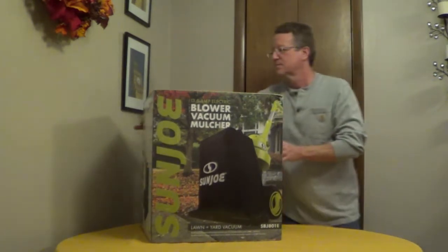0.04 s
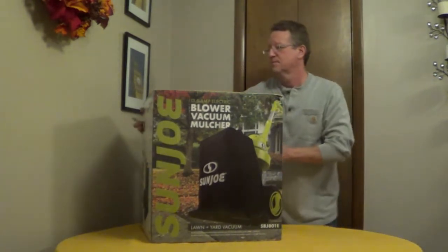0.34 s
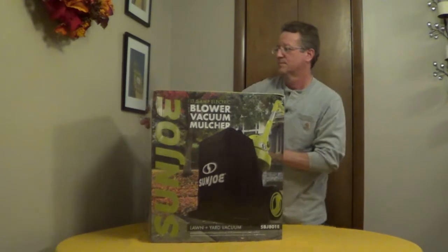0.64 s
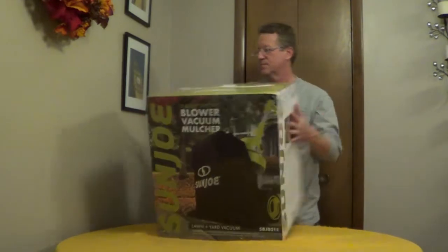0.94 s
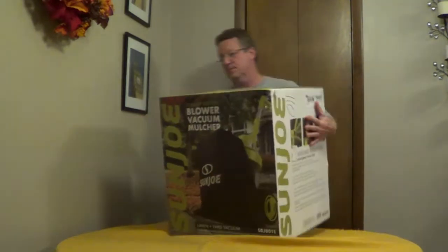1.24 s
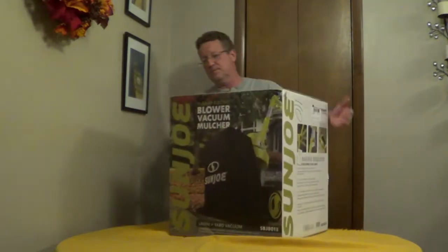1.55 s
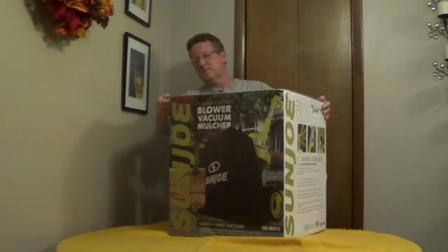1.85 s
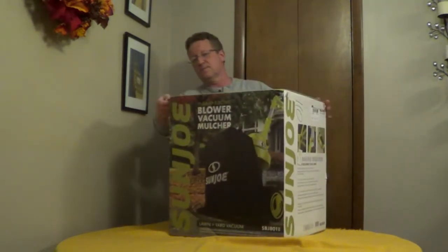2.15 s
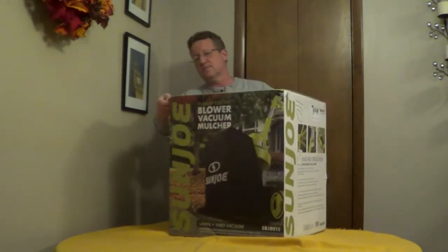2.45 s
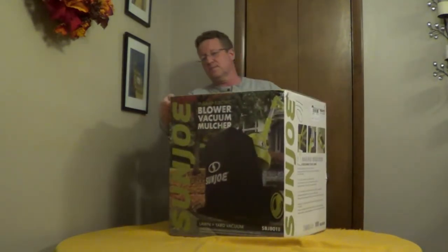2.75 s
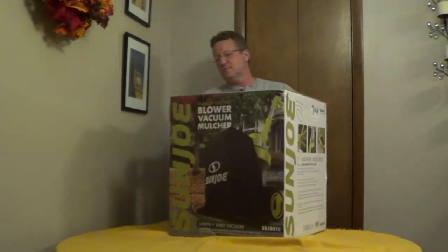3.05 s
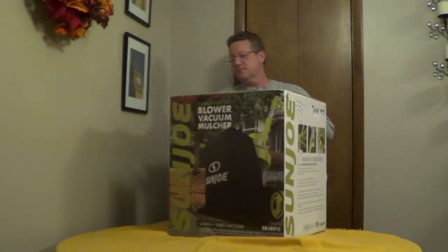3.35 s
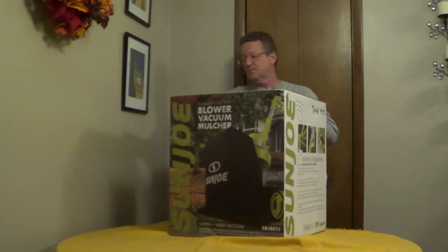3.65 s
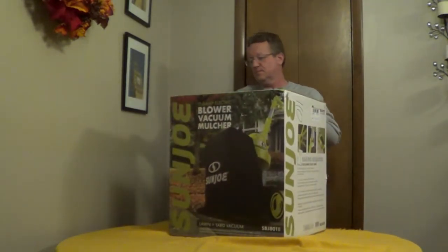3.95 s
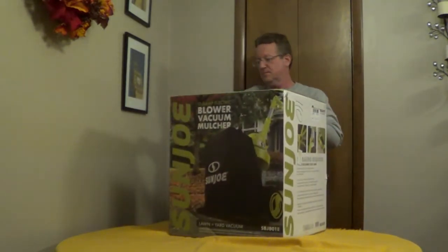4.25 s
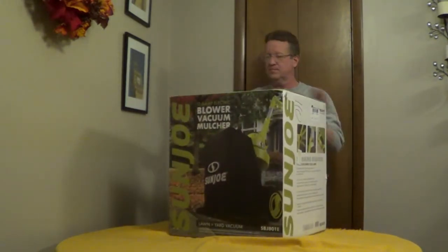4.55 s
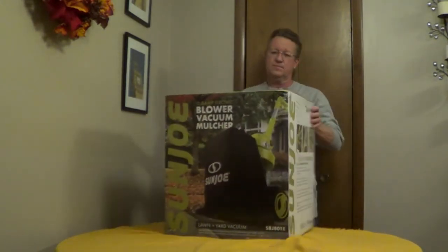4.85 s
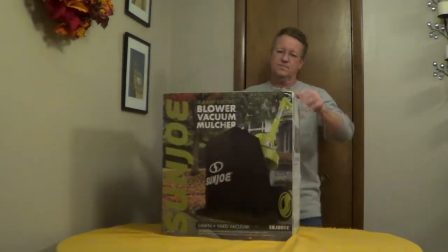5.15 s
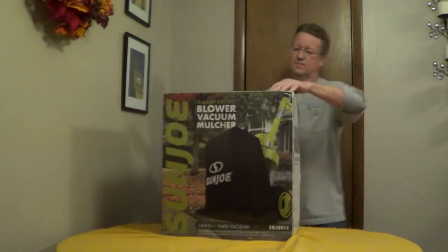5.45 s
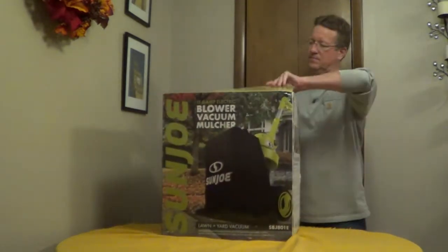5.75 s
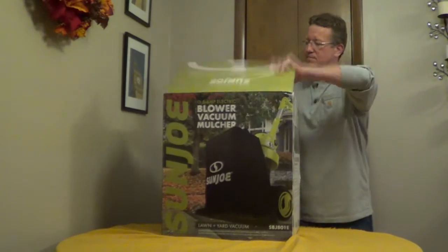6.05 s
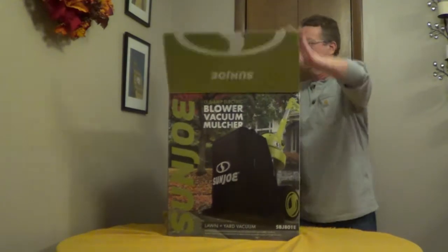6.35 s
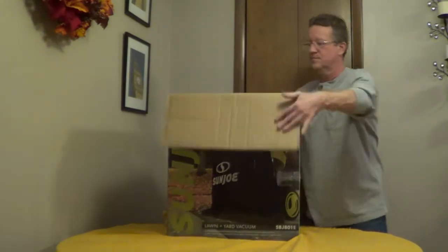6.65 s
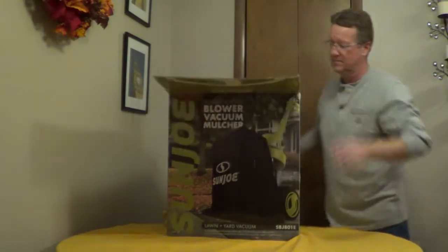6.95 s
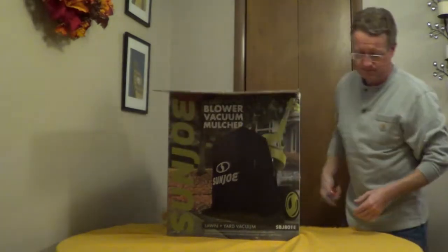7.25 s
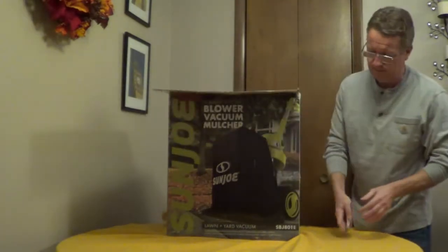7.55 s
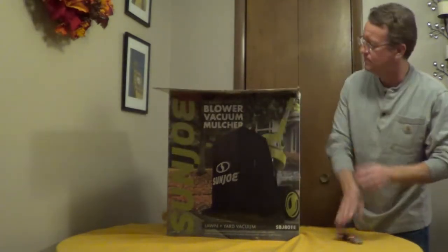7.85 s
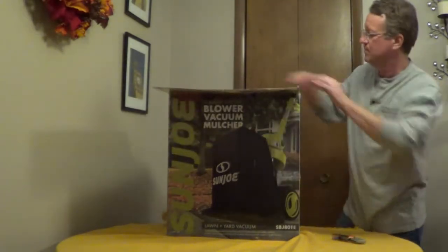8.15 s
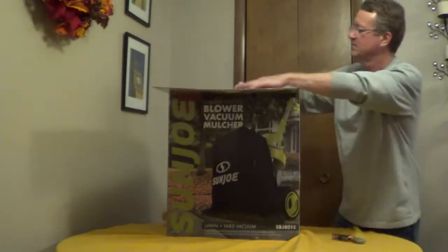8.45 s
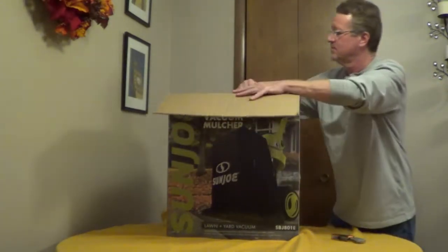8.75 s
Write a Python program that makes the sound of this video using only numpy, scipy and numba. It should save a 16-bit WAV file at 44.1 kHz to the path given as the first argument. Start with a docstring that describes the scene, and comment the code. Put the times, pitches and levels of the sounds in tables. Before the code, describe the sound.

For the first two seconds a large cardboard box rubs and knocks as it is turned on a cloth-covered table, settling with a bump at about 1.5 seconds. From 2.6 seconds a knife slits the packing tape in a dense, crackling rasp that resonates in the box and ends in a sharp crack at 4.4. The box lands with a loud hollow thump at 4.7. Hands rub and tap the cardboard, and at 6.1 the remaining tape rips briefly as a flap is lifted, with scraping and light knocks until about 7.3. The knife gives small metallic clicks from 7.4, then bounces on the table with quick dull thuds around 8. Another flap rubs, creaks softly and folds open with a sharp knock near 8.75. Everything is heard from a few metres away in a small room with faint hiss and a thin high whine.

```python
"""Cardboard rubs, knocks and thumps as a big box is turned round on a table in a small room.
A knife slits the packing tape in dense tiny snaps that ring the board, and the last of the tape rips
as a flap is pulled up. The knife clicks in the hand and bounces on the cloth-covered table; the next
flap is knocked and folded open. We listen from a few metres off, on a camera's two close-set microphones."""
import sys
import numpy as np
from scipy import signal
from scipy.fft import rfft, irfft, next_fast_len
from scipy.io import wavfile
from numba import njit

SR = 44100
rng = np.random.default_rng(int(sys.argv[2]) if len(sys.argv) > 2 else 0)


def log_audio(samples):
    """Write samples as a 16-bit WAV file to the path given in sys.argv[1]."""
    # one column per channel
    frames = np.atleast_2d(samples).T
    # limit to full scale, then quantise
    limited = np.clip(frames, -1, 1)
    pcm = np.round(limited * 32767).astype(np.int16)
    wavfile.write(sys.argv[1], SR, pcm)


N = 388514
TIME = np.arange(N) / SR
RING = np.arange(SR // 2) / SR  # seconds since a blow


def amp(db):
    """Decibels to gain."""
    return 10 ** (np.asarray(db) / 20)


def unit(x):
    """Scale to rms 1."""
    return x / np.sqrt(np.mean(x ** 2))


def peak(x, db):
    """Scale to a peak level."""
    return x * amp(db) / np.abs(x).max()


def add(track, s, sound):
    """Mix a sound into a track at s seconds."""
    i = max(int(s * SR), 0)
    track[i:i + len(sound)] += sound[:N - i]


def rise(seconds):
    """The build-up of a blow."""
    return 1 - np.exp(-RING / seconds)


def fade(t60, hold=0):
    """Exponential decay after a blow, once the hold time is over."""
    return 1000 ** (-np.maximum(RING - hold, 0) / max(t60, 1e-4))


def stroke(middle, length):
    """A movement that swells and eases off, close to a squared sine arch."""
    out, moving = np.zeros(N), np.abs(TIME - middle) < length / 2
    out[moving] = np.abs(np.cos(np.pi * (TIME[moving] - middle) / length)) ** 1.97
    return out


def held(start, hold, attack, t60):
    """Rise, keep going until the hold time is over, then die away."""
    return np.clip((TIME - start) / attack, 0, 1) * 1000 ** (-np.maximum(TIME - start - hold, 0) / t60)


def walk(rate):
    """Random wandering between rate new values a second."""
    return np.interp(TIME * rate, np.arange(N // 20), rng.standard_normal(N // 20))


def on_axis(hz, points):
    """Read (Hz, value) points on a log-frequency axis."""
    f, value = np.transpose(points)
    return np.interp(np.log(hz + 1), np.log(f), value)


def colour(x, points, tilt_db=0, size=4096):
    """Causal filter with the given spectrum, tilted by tilt_db an octave."""
    hz = np.fft.rfftfreq(size, 1 / SR)
    gain = amp(on_axis(hz, points) + tilt_db * np.log2(hz / SR + 1 / size))
    cepstrum = irfft(np.log(gain))
    cepstrum[1:size // 2] *= 2
    cepstrum[size // 2 + 1:] = 0
    return signal.oaconvolve(x, irfft(np.exp(rfft(cepstrum))))[:len(x)]


def low_cut(x, hz):
    """Take away the bass below hz."""
    return signal.sosfilt(signal.butter(3, hz, "high", fs=SR, output="sos"), x)


@njit
def resonate(x, hz, width):
    """State-variable band-pass with a moving centre; width as a share of the centre."""
    y, band, low = np.empty(len(x)), 0., 0.
    for i in range(len(x)):
        g = np.tan(np.pi * hz[i] / SR)
        v = (band + g * (x[i] - low)) / (1 + g * (g + width))
        band, low, y[i] = 2 * v - band, low + 2 * g * v, width * v
    return y


def band_pass(x, hz, width):
    """A resonance that stays at one pitch."""
    return resonate(x, np.full(len(x), float(hz)), float(width))


def snaps(rate, spread_db):
    """Fibres letting go at random: many small clicks and a few large ones."""
    size = amp(spread_db * np.minimum(rng.exponential(size=N), 4))
    return unit((rng.random(N) < rate / SR) * size * rng.standard_normal(N))


def burst(t60):
    """A dying patter of tiny contacts."""
    return rng.standard_normal(len(RING)) * fade(t60)


def ring(modes, detune, sag=0, hold=0, relax_s=0.028):
    """Damped modes, detuned as each blow finds a new spot; dented board starts sharp and sags."""
    clock = RING + sag * relax_s * rise(relax_s)
    out = 0
    for hz, db, t60 in modes:
        pitch = hz * (1 + detune * rng.standard_normal())
        out += amp(db) * fade(t60, hold) * np.sin(2 * np.pi * pitch * clock) * rng.choice([-1, 1])
    return out


def tick(contact_s, tilt_db, spectrum):
    """One hard little contact, raspy if it lasts; peak 1."""
    scrape = burst(contact_s * np.log(1000)) * rise(max(0.16 * contact_s, 1e-5))
    return peak(low_cut(colour(scrape, spectrum, tilt_db), hz=1420), 0)


# Tone of the rubbed panels and of their surface. Each row: frequency in Hz, level in dB.
RUB_PANEL = [(60, -54), (110, -5.5), (200, 4.5), (330, 0), (520, 11), (750, 5.5), (1100, 4.5), (1800, 2.5),
             (2600, -4.5), (5000, -44)]
RUB_HISS = [(1200, -30.5), (2800, -7), (4500, 0), (7000, 1), (9500, 0.5), (12000, -7.5), (15500, -16.5)]
# The box slides on the tablecloth; hands and flaps rub. Each row: middle and length in seconds,
# panel and hiss levels in dB, pitch of the rubbed spot in Hz.
RUBS = [(0, 0.18, -42, -43, 770), (0.146, 0.35, -44, -43, 1820), (0.378, 0.37, -49.5, -52, 1220),
        (0.662, 0.3, -47.5, -64, 527), (0.847, 0.89, -60, -48.5, 625), (1.048, 0.58, -40, -43.5, 378),
        (1.353, 0.92, -48.5, -53.5, 407), (1.508, 0.17, -41.5, -47, 450), (1.998, 0.35, -57.5, -61, 600),
        (2.333, 0.071, -49, -48, 700), (2.482, 0.24, -72, -49.5, 704), (5.083, 1, -49, -52, 990),
        (5.405, 0.23, -38.5, -45.5, 513), (5.57, 0.34, -48, -54, 620), (5.669, 0.24, -45.5, -45.5, 810),
        (5.779, 0.089, -47, -45.5, 2320), (5.86, 0.26, -44.5, -47, 950), (6.06, 0.42, -53.5, -52, 870),
        (6.294, 0.099, -39, -60, 855), (6.43, 0.51, -40.5, -38.5, 820), (6.641, 0.26, -39.5, -45.5, 755),
        (6.79, 0.19, -45, -42.5, 527), (6.943, 0.4, -46.5, -53, 526), (7.214, 0.41, -44, -47.5, 497),
        (8.148, 0.79, -52.5, -62, 484), (8.555, 0.57, -52, -57, 477), (8.742, 0.4, -36.5, -49, 487)]

def rubbing(spot_db=-1, roam_octaves=0.11):
    """Cardboard slips in small jerks: the panels murmur, the touched spot rings, the surface hisses."""
    panel_level = np.sqrt(sum((amp(db) * stroke(s, length)) ** 2 for s, length, db, _, _ in RUBS))
    hiss_level = np.sqrt(sum((amp(db) * stroke(s, length)) ** 2 for s, length, _, db, _ in RUBS))
    friction = snaps(rate=12000, spread_db=2.7) * amp(2.5 * walk(60))
    middles, *_, pitches = np.transpose(RUBS)
    spot_hz = np.interp(TIME, middles, pitches) * 2 ** (roam_octaves * walk(7.8))
    spot = resonate(snaps(rate=3000, spread_db=0.99), spot_hz, width=0.85)
    body = unit(unit(colour(friction, RUB_PANEL)) + amp(spot_db) * unit(spot))
    return panel_level * body + hiss_level * unit(colour(friction, RUB_HISS))


# The quiet of the small room. Each row: frequency in Hz, relative noise density in dB.
ROOM_TONE = [(30, -16), (100, -21), (170, -6.5), (280, -13), (400, -6.5), (600, -9.5), (1200, -10),
             (2400, -12), (3000, -12.5), (8000, -18.5), (11000, -21.5), (15500, -29)]

def room_tone(level_db=-54, whine_hz=15734.3, whine_db=-61):
    """Steady room noise at both microphones, and a thin electronic whine."""
    mid, side = (amp(level_db) * unit(colour(rng.standard_normal(N), ROOM_TONE)) for _ in range(2))
    return pair(mid, side) + amp(whine_db) * unit(np.sin(2 * np.pi * whine_hz * TIME))


# The hollow of the box. Each row: pitch in Hz, level in dB, t60 in seconds.
BOX_MODES = [(152.5, -17, 0.091), (222.4, -1.5, 0.13), (275, -10, 0.23), (333.7, -14.5, 0.2),
             (392.4, -14, 0.098), (427.6, -14.5, 0.22)]
# The struck spot. Each row: multiple of its pitch, level in dB.
SPOT_MODES = [(0.802, -4.5), (1, 0.5), (1.089, -4.5)]
# Tone of the panel's slap and of the surface's crack. Each row: frequency in Hz, level in dB.
BOX_SLAP = [(40, -42), (100, -25), (200, -19.5), (400, 2.5), (560, 0), (780, 3), (1050, 0), (1400, -6.5),
            (2000, -9), (3000, -13.5), (6000, -57)]
BOX_CRACK = [(1000, 5.5), (2300, 0.5), (4500, 1.5), (8500, 0), (11000, -7.5), (15500, -15)]
# Blows on the box. Each row: start in seconds, slap level in dB, boom in dB relative to the slap,
# hardness as brightness in dB per octave, pitch of the struck spot in Hz, its level in dB.
KNOCKS = [(0.168, -32.5, -18, 1.5, 1600, -28), (0.223, -51, 3.5, -19, 533, -48),
          (0.524, -33.5, -20, 2, 1760, -38), (0.650, -33.5, -10, -3.5, 515, -31),
          (1.226, -32, -9, 4.5, 575, -36), (1.526, -27.5, -16, -1.5, 450, -30),
          (1.5404, -17, -14, -2, 1306, -23.5), (1.583, -31, -3, -8.5, 584, -27.5),
          (1.668, -31.5, -22, -5.5, 590, -38), (1.729, -35.5, 3, 5.5, 395, -38),
          (1.748, -28.5, -9, 4.5, 594, -31), (1.953, -33, -13.5, -5, 570, -39),
          (2.331, -55, -22, 2, 405, -52), (2.600, -38.5, -0.5, 6, 170, -38),
          (4.426, -22.5, -14, -4.5, 492, -23), (4.714, -28, -11, 0, 277, -36),
          (4.729, -18, -20, -1, 772, -18), (4.750, -20, -4, -3, 430, -26),
          (5.047, -38, -11, -8.5, 494, -37), (5.302, -38, -14, 2, 180, -40),
          (5.491, -28, -26, 4, 1280, -41), (5.720, -34, -26, -5, 803, -30),
          (6.121, -14, -21, -1.5, 736, -27), (6.202, -20, -20, -1.5, 517, -27),
          (6.429, -26, -12.5, 2, 900, -27), (6.472, -38.5, 4.5, -11, 182, -29),
          (6.776, -28, -14, -6, 476, -30), (7.062, -35, -33, 2, 1510, -44),
          (8.436, -45, -4.5, -12, 174, -38), (8.464, -39, -4, 12.5, 2033, -33),
          (8.577, -30.5, 2, -3.5, 175, -26.5), (8.673, -22, -20, 4, 1170, -30),
          (8.712, -22.5, -10, 2.5, 1340, -33), (8.751, -17.5, -9.5, 5.5, 1425, -17)]

def knocks(slap_t60=0.14, crack_t60=0.095, spot_t60=0.076, swell_s=0.014):
    """The panel slaps, the spot rings, the hollow swells after; harder blows are quicker and crack more."""
    out = np.zeros(N)
    for s, db, boom_db, hardness, hz, spot_db in KNOCKS:
        contact_s = 0.0007 * 2 ** (-hardness / 22) / amp(db) ** 0.18  # board stiffens under load
        push, swell = rise(contact_s), rise(contact_s + swell_s)
        spot_modes = [(hz * ratio, mode_db, spot_t60) for ratio, mode_db in SPOT_MODES]
        spot = ring(spot_modes, detune=0.0063, sag=0.015)
        add(out, s, peak(colour(burst(slap_t60) * push, BOX_SLAP, hardness), db))
        add(out, s, peak(spot * push, spot_db - 2))
        add(out, s, peak(ring(BOX_MODES, detune=0.015, sag=0.05) * swell, db + boom_db))
        add(out, s, peak(colour(burst(crack_t60) * push, BOX_CRACK), db + 0.98 * hardness - 2))
    return low_cut(out, hz=122)


# Air pushed out at the box. Each row: start in seconds, level in dB.
PUFFS = [(1.528, -40), (4.733, -40), (8.75, -58)]

def puffs():
    """Setting the box down or folding a flap gives a short, very low push of air."""
    out = np.zeros(N)
    for s, db in PUFFS:
        add(out, s, peak(band_pass(burst(t60=0.4), hz=45, width=1), db))
    return out


# The walls of the box. Each row: pitch in Hz, level in dB, t60 in seconds.
PANEL_MODES = [(564, 1, 0.1), (670, 2.5, 0.065), (760, 2, 0.11), (975, -12, 0.19), (1267, -16, 0.2),
               (1504, -10, 0.055), (1776, -14, 0.07), (2050, -15.5, 0.043)]
# The whole box drops back on the table. Each row: start in seconds, boom level in dB,
# seconds for which its weight drives the boom, clap level in dB.
THUMPS = [(1.545, -30, 0.022, -25), (1.749, -30, 0.048, -32), (4.7285, -13, 0.05, -11.5)]

def thumps(swell_s=0.0063, clap_s=0.0015, linger_hz=227, linger_db=-21, linger_t60=0.64):
    """The box lands: its panels clap, the hollow swells to a clean boom, and one low note lingers."""
    out = np.zeros(N)
    for s, db, hold, clap_db in THUMPS:
        hollow = ring(BOX_MODES, detune=0.0031, hold=hold)
        low_note = ring([(linger_hz, linger_db, linger_t60)], detune=0.0057, hold=hold)
        add(out, s, peak((hollow + low_note) * rise(swell_s), db))
        add(out, s, peak(ring(PANEL_MODES, detune=0.0024) * rise(clap_s), clap_db))
    return out


# Tone of a crack. Each row: frequency in Hz, level in dB.
CRACK_COLOUR = [(500, -69), (1500, -3), (2500, 2.5), (4000, 3), (6500, 7), (10000, 7.5), (12000, -1),
                (15500, -9)]
# Stiff tape and creasing card. Each row: start in seconds, level in dB, brightness in dB per octave,
# contact in seconds, snap in dB relative to the scrape, pitch in Hz.
CRACKS = [(1.6165, -30, -3, 0.0011, 1, 5500), (3.222, -28.5, -8, 0.008, -8, 2600),
          (3.959, -24, -2, 0.0006, -5, 6000), (4.275, -29, 8, .003, -1, 7000),
          (4.533, -25, -5.5, 0.01, -3, 6470), (4.705, -35, -1, 0.0072, 4, 6000),
          (5.844, -25.5, -2.5, 0.00064, -1.5, 5000), (5.868, -29, 1, 0.0095, -8, 7500),
          (6.246, -30.5, -7, 0.0078, -10, 4300), (6.293, -30, -5, 0.01, -8, 4500),
          (6.901, -27, -2.5, 0.011, -13, 2900), (7.064, -32, -10, 0.0026, -4, 1790),
          (8.596, -26, -5, 0.006, -14, 7600), (8.6765, -23, -9, 0.0025, -5, 3500),
          (8.7505, -13.5, 1, 0.0098, 4, 8700)]

def cracks(gain_db=1, snap_s=0.00061, ring_db=1):
    """Tape and card give way: a first snap and a short scrape, coloured by the piece that cracks."""
    out = np.zeros(N)
    for s, db, tilt_db, contact_s, snap_db, hz in CRACKS:
        snap = amp(snap_db) * tick(snap_s, tilt_db, CRACK_COLOUR)
        strike = snap + tick(contact_s, tilt_db, CRACK_COLOUR)
        piece = amp(ring_db) * band_pass(strike, hz, width=0.22)
        add(out, s, amp(db + gain_db) * (strike + piece))
    return out


# How hard the blade is drawn along the taped seam. Each row: time in seconds, effort in dB.
SLIT_EFFORT = [(2.62, -51), (2.654, -44.5), (2.684, -40), (3.236, -32), (3.532, -35.5), (3.97, -32),
               (4.058, -32.5), (4.138, -30.5), (4.39, -32)]
# The blade sticks and jerks free. Each row: middle and length in seconds, extra level in dB.
CATCHES = [(2.777, 0.04, 3.5), (2.852, 0.044, 2), (3.06, 0.078, 3), (3.143, 0.05, 3.5), (3.183, 0.023, 4.5),
           (3.228, 0.045, 5), (3.337, 0.041, 4.5), (3.908, 0.068, 2), (3.963, 0.048, 0.5),
           (4.124, 0.031, 8), (4.153, 0.037, 8)]
# The flap edge rings lower as it is cut free. Each row: time in seconds, pitch in Hz, level in dB.
FREE_EDGE = [(2.6, 580, -3), (2.85, 560, 0), (3.35, 545, -1), (3.5, 417, -8), (3.72, 384, 2),
             (3.98, 386, 3.5), (4.1, 338, -5.5), (4.4, 340, -1)]
# Board ringing as the blade passes. Each row: middle and length in seconds, pitch in Hz, level in dB.
SEAM_MODES = [(2.9, 0.66, 1576, -7), (3.15, 1, 5100, -25), (3.254, 0.92, 2030, -8), (3.7, 0.9, 3690, -17.5),
              (3.853, 0.6, 2930, -12), (3.875, 0.43, 7100, -7), (4.15, 0.38, 1055, -11),
              (4.15, 0.44, 1566, -12), (4.1, 0.89, 4040, -14)]
# Tone of the panel and of the rasp under the blade. Each row: frequency in Hz, level in dB.
SLIT_PANEL = [(60, -35), (100, -5.5), (170, -4), (220, -3.5), (300, 2.5), (400, 5), (700, 2.5), (1100, 2.5),
              (1400, 1), (2000, -4.5), (2600, -20), (4000, -33)]
SLIT_RASP = [(1200, -24), (2400, 4.5), (4000, 3), (7000, 3.5), (9500, 0.5), (12000, -7), (15500, -14.5)]

def slitting(flute_hz=46, flute_depth=0.29, drift_octaves=0.016, rasp_growth=1.197):
    """The blade parts tape in dense snaps, ringing edge, board and box, and bumps over the flutes."""
    times, effort_db = np.transpose(SLIT_EFFORT)
    effort = amp(np.interp(TIME, times, effort_db))
    effort *= held(times[0], times[-1] - times[0], attack=0.039, t60=0.7)
    jerk_db = sum(db * stroke(s, length) for s, length, db in CATCHES)
    flutes = np.sin(2 * np.pi * np.cumsum(flute_hz * (1 + 0.053 * walk(12))) / SR)
    drag = (1 + flute_depth * flutes) * amp(1.7 * walk(110))
    cutting = snaps(rate=13000, spread_db=0.9) * drag

    edge_times, *edge_curves = np.transpose(FREE_EDGE)
    edge_hz, edge_db = (np.interp(TIME, edge_times, curve) for curve in edge_curves)
    edge = snaps(rate=4000, spread_db=1.1) * drag
    for _ in range(2):
        edge = resonate(edge, edge_hz, width=0.32)
    body = amp(-6) * unit(colour(cutting, SLIT_PANEL)) + amp(edge_db - 9) * unit(edge)
    for modes, db in ((BOX_MODES, -21), (PANEL_MODES, -18)):
        body += amp(db) * unit(signal.oaconvolve(cutting, ring(modes, detune=0.0051))[:N])
    for s, length, hz, db in SEAM_MODES:
        board = resonate(cutting, hz * 2 ** (drift_octaves * walk(4.2)), width=0.028)
        body += amp(db - 8) * stroke(s, length) * unit(board)

    rasp = amp(1.5 + 0.29 * jerk_db) * unit(colour(cutting, SLIT_RASP))
    deep_cut = held(start=3.12, hold=1.22, attack=0.32, t60=0.5)  # deep enough for the flutes to throb
    throb = amp(-29) * deep_cut * unit(flutes * amp(3 * walk(14)))
    return effort * (amp(jerk_db) * body + throb) + effort ** rasp_growth * rasp


# Tone of the shaken panel and of the tearing tape. Each row: frequency in Hz, level in dB.
RIP_PANEL = [(40, -9), (100, -19), (180, -6), (240, 0), (350, -4), (510, -3), (700, -7.5), (1050, 1),
             (1250, -2.5), (1950, 5), (2900, -40), (4000, -58.5)]
RIP_RASP = [(1300, -2), (2600, -1), (4500, -0.5), (8500, -3.5), (11000, -10), (15500, -26)]
# The pulled flap. Each row: pitch in Hz, width as a share of the pitch, level in dB.
FLAP_MODES = [(510, 0.46, 7), (704, 0.089, 2), (1020, 0.084, -16), (1434, 0.12, -5), (1928, 0.066, 6)]
# Tape tears at the end of the cut and under the lifted flap.
# Each row: start and length in seconds, panel and rasp levels in dB.
RIPS = [(4.401, 0.01, -30, -35), (6.092, 0.034, -41.5, -30.5), (6.110, 0.064, -18.5, -28),
        (6.243, 0.013, -47, -37)]

def ripping(slack_db_per_s=40):
    """Taut tape gives way in coarse snaps that shake the flap; the rasp weakens as it goes slack."""
    shake_level = rasp_level = 0
    for s, hold, shake_db, rasp_db in RIPS:
        pull = held(s, hold, attack=0.006, t60=0.27)
        shake_level += amp(shake_db) * pull
        rasp_level += amp(rasp_db - slack_db_per_s * np.clip(TIME - s, 0, hold)) * pull
    tearing = snaps(rate=2500, spread_db=0.88) * amp(1.5 * np.tanh(walk(250)))
    flap = sum(amp(db) * unit(band_pass(tearing, hz, width)) for hz, width, db in FLAP_MODES)
    body = amp(-2) * unit(colour(tearing, RIP_PANEL)) + amp(-3) * unit(flap)
    rasp = amp(-0.6) * unit(colour(tearing, RIP_RASP))
    return low_cut(shake_level * body + rasp_level * rasp, hz=130)


# Tone of the strand breaking at the end of the seam. Each row: frequency in Hz, level in dB.
PARTING_CRACK = [(100, -13), (220, -6), (450, 5), (800, -3), (1400, 3), (2500, -5.5), (6000, -4.5),
                 (10000, -7.5), (12000, -17), (15500, -31)]

def parting(start_s=4.4215, level_db=-6):
    """The last strand of tape parts under the blade in one short, dense crack."""
    out = np.zeros(N)
    fibres = rng.standard_normal(len(RING)) * fade(t60=0.019, hold=0.009) * rise(0.001)
    add(out, start_s, peak(colour(fibres, PARTING_CRACK), level_db))
    return out


# Tone of the knife's ticks. Each row: frequency in Hz, level in dB.
KNIFE_COLOUR = [(500, -69), (1800, -9), (2700, 0), (4500, -3), (6400, 2), (8200, 2.5), (9900, 3.5),
                (12000, -9.5), (15500, -18)]
# The knife's metal. Each row: pitch in Hz, level in dB, t60 in seconds.
KNIFE_MODES = [(2520, -5, 0.19), (2760, -4, 0.19), (3090, 0, 0.13), (5500, 1, 0.11), (6170, 5, 0.13),
               (7170, -8, 0.11), (9950, -8, 0.062), (10840, 1, 0.09)]
# The knife is handled and its blade clicks home. Each row: start in seconds, level in dB,
# brightness in dB per octave, contact in seconds, relative levels of snap and ring in dB.
KNIFE_CLICKS = [(7.4157, -28, -2, 0.0015, 7.5, -13), (7.421, -25.5, -2.5, 0.0014, -4, -12),
                (7.465, -21.5, -3.5, 0.0033, -6, -10.5), (7.473, -27.5, -4, 0.0043, -3, -12),
                (7.603, -30, -4.5, 0.0032, -11, -10), (7.615, -30.5, -6, 0.0073, 0, -6),
                (7.64, -29.5, -3.5, 0.0067, -6, -12), (7.646, -21, 8, 0.0018, 10, -12),
                (7.653, -32, -2, 0.003, -6, -12), (7.788, -32, 1.5, 0.0047, 2, -17),
                (7.817, -38, 2, 0.0054, 2, -18)]

def knife_clicks(gain_db=3, snap_s=0.00055):
    """The knife's parts meet: a first snap, a short scrape and a metallic ring."""
    out = np.zeros(N)
    for s, db, tilt_db, contact_s, snap_db, metal_db in KNIFE_CLICKS:
        snap = amp(snap_db) * tick(snap_s, tilt_db, KNIFE_COLOUR)
        scrape = tick(contact_s, tilt_db, KNIFE_COLOUR)
        modes = [(hz, mode_db + tilt_db * np.log2(hz), t60) for hz, mode_db, t60 in KNIFE_MODES]
        metal = peak(ring(modes, detune=0.0045), metal_db - 2)
        add(out, s, amp(db + gain_db) * (snap + scrape + metal))
    return out


# The table top. Each row: pitch in Hz, level in dB, t60 in seconds.
TABLE_MODES = [(152, -5.5, 0.48), (231.3, 4, 0.32), (278, -1.5, 0.42), (420, -4, 0.19), (434, 1, 0.36),
               (510, 10.5, 0.09), (670, -1, .12), (727, 10, 0.046), (790, -5, 0.046), (863, -3, 0.075)]
# Tone of a thud through the cloth. Each row: frequency in Hz, level in dB.
TABLE_THUD = [(60, -60), (110, -35), (170, -11.5), (500, -4.5), (730, 0), (1000, -8.5), (1600, -14.5),
              (3000, -18)]
# The knife lands on the table. Each row: start in seconds, thud level in dB,
# its brightness in dB per octave, tick of the loose blade in dB.
KNIFE_BOUNCES = [(7.858, -12.5, -4, -13.5), (7.874, -12, -6.5, -26), (7.892, -21.5, -10, -33),
                 (7.942, -20.5, -5, -19), (7.955, -15.5, -14.5, -46), (7.973, -20, -8, -25),
                 (8.018, -18.5, -11.5, -30), (8.046, -24, -18, -32)]

def knife_bounces(blade_hz=2620, blade_t60=0.15):
    """The dropped knife rocks, ticks and rings faintly; the cloth softens it and the table top booms."""
    out = np.zeros(N)
    for s, db, tilt_db, tick_db in KNIFE_BOUNCES:
        add(out, s, peak(colour(burst(t60=0.13), TABLE_THUD, tilt_db), db - 2))
        add(out, s, peak(ring(TABLE_MODES, detune=0.0238), db - 2))
        add(out, s, peak(ring(KNIFE_MODES, detune=0.0031), db - 28))
        add(out, s, peak(ring([(blade_hz, 0, blade_t60)], detune=0.008), db - 32))
        add(out, s, amp(tick_db) * tick(contact_s=0.0029, tilt_db=1, spectrum=KNIFE_COLOUR))
    return low_cut(out, hz=176)


def flap_groan(hz=480, width=0.1, level_db=-51):
    """The loose flap groans softly at its fold as it springs back."""
    fold = band_pass(snaps(rate=1300, spread_db=1), hz, width)
    return amp(level_db) * stroke(middle=8.7, length=0.36) * unit(band_pass(fold, hz, width))


# Tone of the small room's echoes. Each row: frequency in Hz, level in dB.
ROOM_COLOUR = [(60, -28), (250, 0.5), (700, -2.5), (2500, 3), (7000, 3), (15000, -5)]

def reflections(x, early_t60=0.072, early_db=-5, late_t60=0.34, late_db=-8):
    """Table and corner walls answer at once; the room rings on briefly above the bass."""
    # Each part of the box has its own echo pattern; the sound wanders among six.
    shares = np.array([walk(50) for _ in range(6)])
    shares /= np.sqrt(np.sum(shares ** 2, axis=0))
    out = 0
    for share in shares:
        early = unit(burst(early_t60) * (RING > .003))
        late = unit(low_cut(burst(late_t60) * (RING > .008), hz=273))
        out += signal.oaconvolve(x * share, amp(early_db) * early + amp(late_db) * late)[:N]
    return colour(out, ROOM_COLOUR) / np.sqrt(len(RING))


# The box as the two microphones hear it. Each row: frequency in Hz, lead of the left in radians.
LEFT_LEAD = [(40, 0.082), (200, 0.6), (500, 1.19), (1000, 1.2), (2000, 0.95), (4000, 0.38), (8000, 0.82),
             (10500, 0)]
# Left-right difference of diffuse sound. Each row: frequency in Hz, level in dB.
DIFFUSE_WIDTH = [(50, -7), (100, -12), (200, -21), (700, -4), (1500, -3), (5000, -7), (8500, -20),
                 (11000, -36)]

def pair(mid, side):
    """Two close-set microphones: the box reaches the left first; diffuse sound differs between them."""
    size = next_fast_len(N + SR // 10)
    turn = np.exp(.5j * on_axis(np.fft.rfftfreq(size, 1 / SR), LEFT_LEAD))
    spectrum, difference = rfft(mid, size), colour(side, DIFFUSE_WIDTH)
    left = irfft(spectrum * turn, size)[:N] + difference
    right = irfft(spectrum / turn, size)[:N] - difference
    return np.array([left, right])


def scene(direct_db=-1.5, lean_left_db=0.56, thump_room_db=-8, parting_room_db=-5):
    """Everything happens at the table, heard from a few metres off, directly and through the room."""
    box = rubbing() + slitting() + ripping() + knocks() + flap_groan() + puffs() + cracks()
    table = box + knife_clicks() + knife_bounces()
    thump, strand = thumps(), parting()
    direct = amp(direct_db) * (table + thump + strand)
    into_room = table + amp(thump_room_db) * thump + amp(parting_room_db) * strand
    heard = pair(mid=direct + reflections(into_room), side=reflections(into_room))
    return heard * amp([[lean_left_db], [-lean_left_db]]) + room_tone()


def record(dry):
    """The camera rounds the highest peaks and cuts the treble above 16.2 kHz."""
    rounded = .75 * np.tanh(dry / .75)
    return signal.sosfilt(signal.ellip(10, .1, 80, 16200, fs=SR, output="sos"), rounded)


dry = scene()
out = record(dry)
log_audio(out)
```